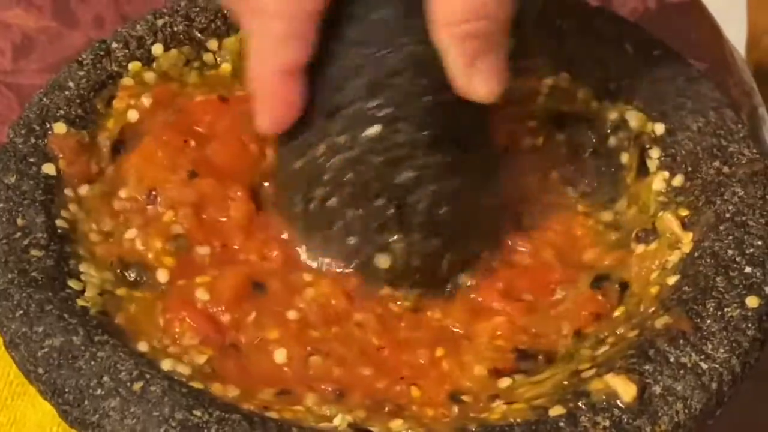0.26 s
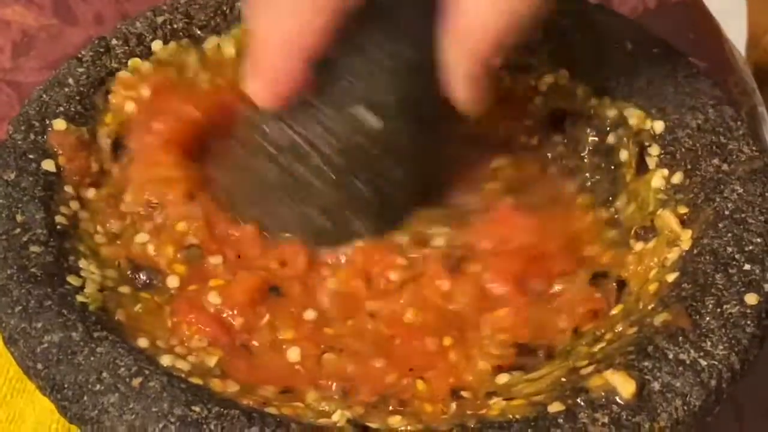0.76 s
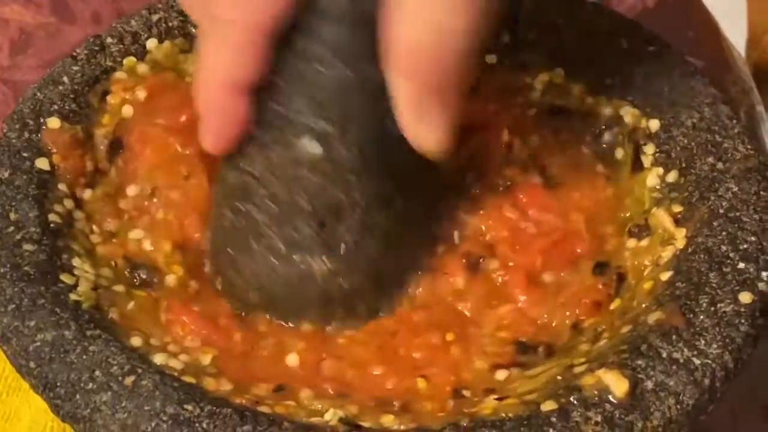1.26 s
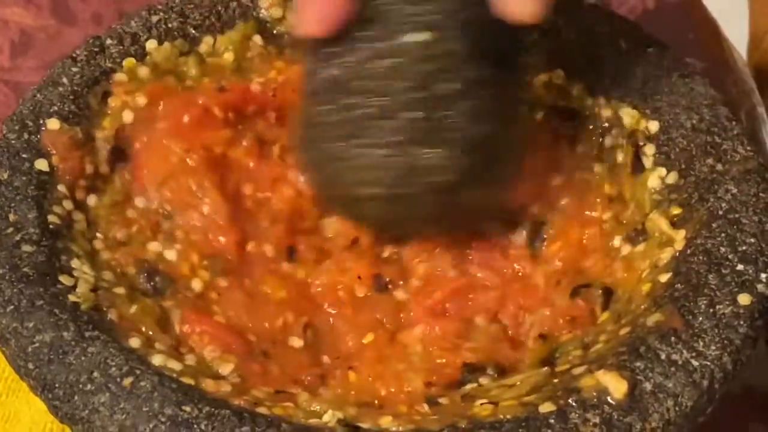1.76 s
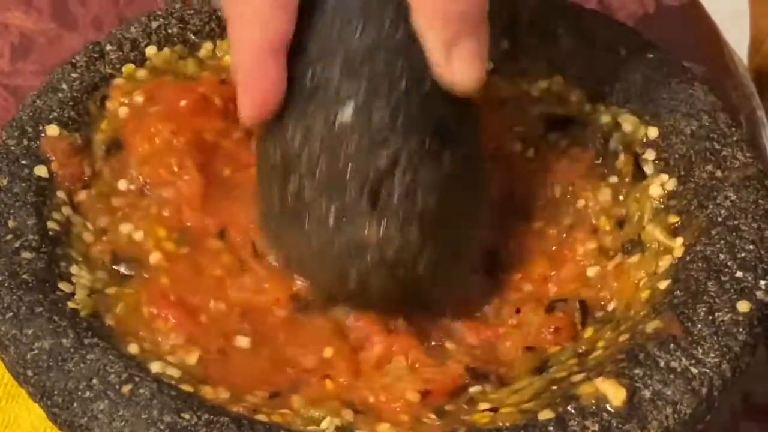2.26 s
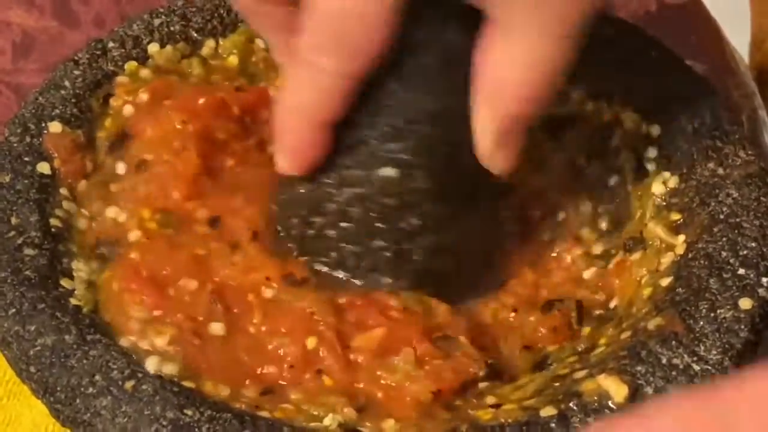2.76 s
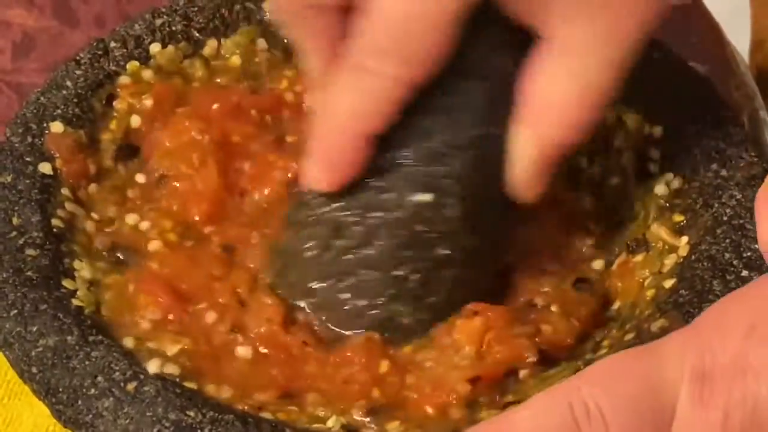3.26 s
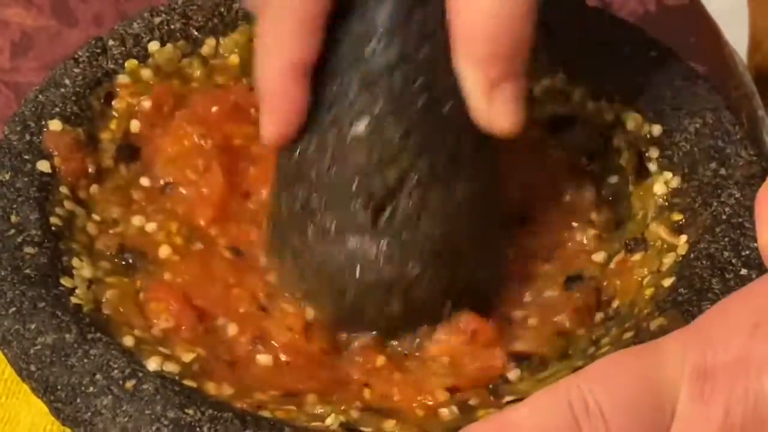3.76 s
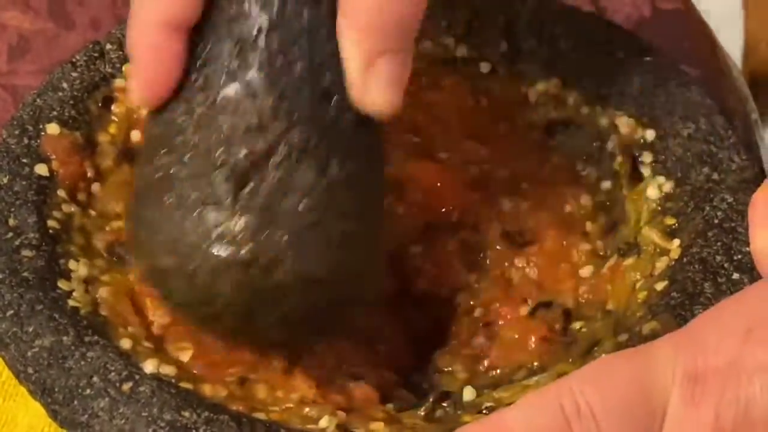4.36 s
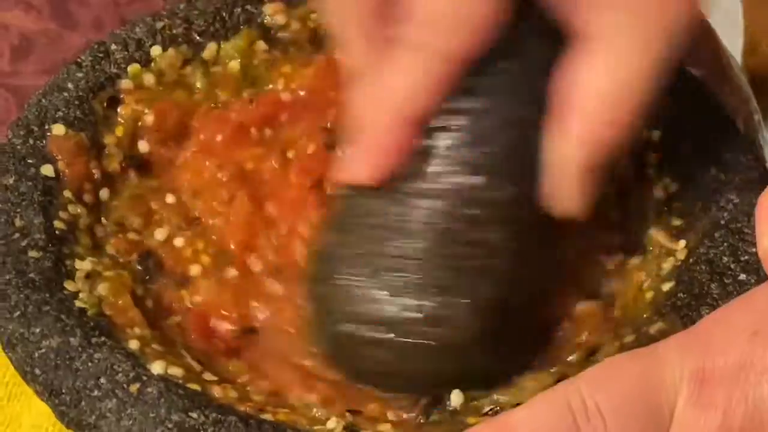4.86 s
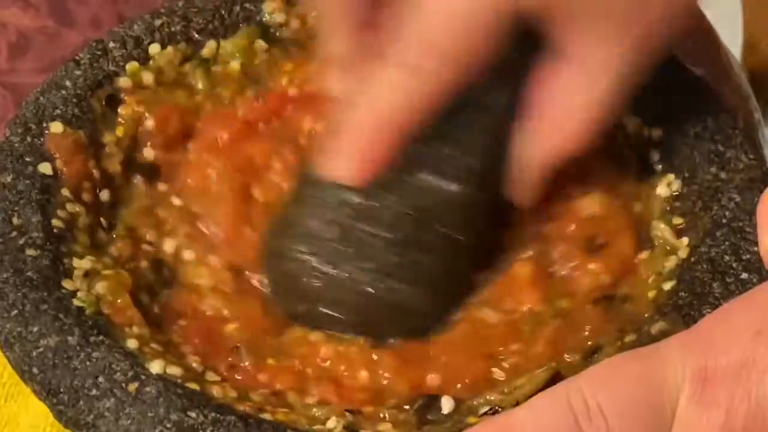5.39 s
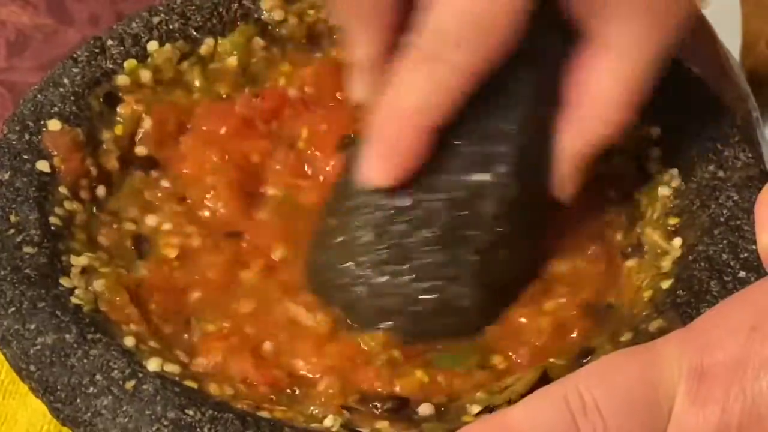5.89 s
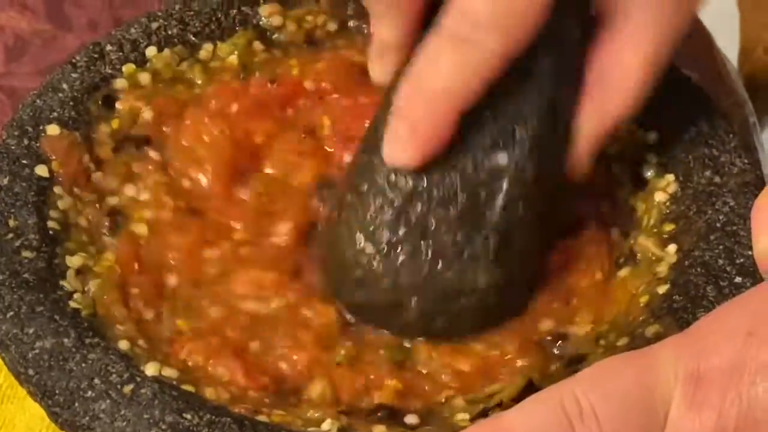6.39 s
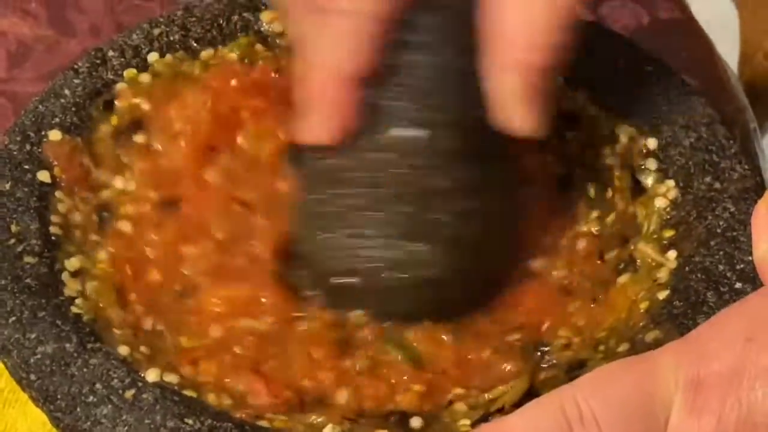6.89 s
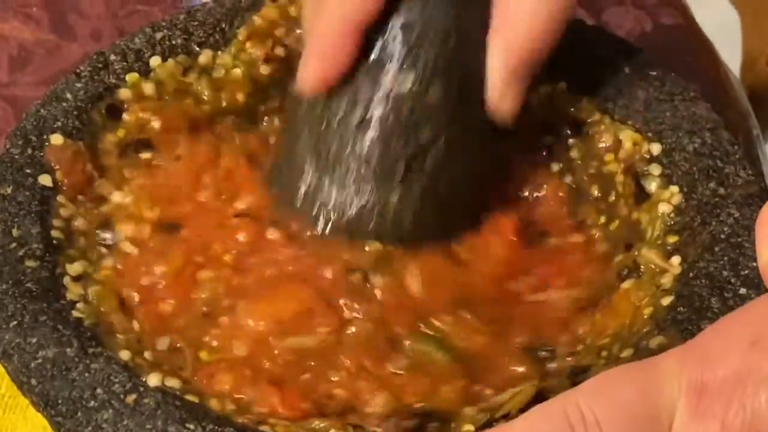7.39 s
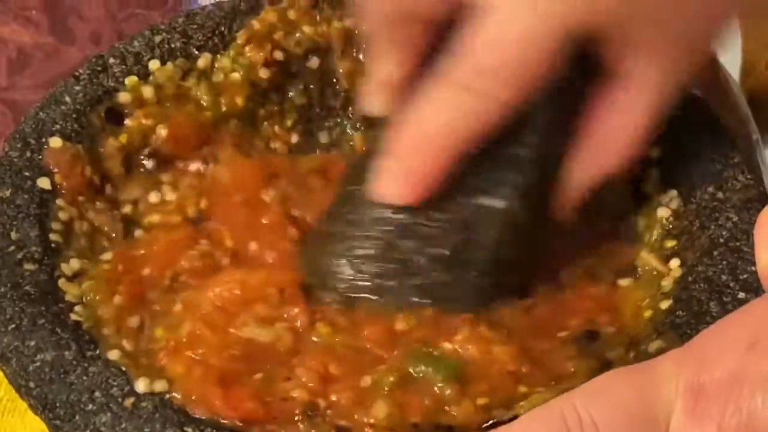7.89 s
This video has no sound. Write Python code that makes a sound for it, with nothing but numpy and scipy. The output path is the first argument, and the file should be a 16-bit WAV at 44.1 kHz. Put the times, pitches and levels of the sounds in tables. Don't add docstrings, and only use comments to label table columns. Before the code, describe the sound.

Close stereo sound of hand grinding in a rough stone bowl. It opens with a firm clack, then spaced, muffled knocks and quiet rubbing through mush. Midway the pestle strikes in quick clusters, with sharp stony cracks, crushed grit, brief hollow bowl ring and deep table thumps. Tiny wet snaps and bubble pops dot the gaps. The room is quiet and small, its echo faint, and the work remains uneven to the end.

```python
import sys
import numpy as np
from scipy import signal
from scipy.fft import rfft, irfft, next_fast_len
from scipy.io import wavfile

SR = 44100
rng = np.random.default_rng(int(sys.argv[2]) if len(sys.argv) > 2 else 0)


def master_out(mix):
    frames = np.transpose(np.atleast_2d(mix))
    ceiling = np.clip(frames, -1, 1)
    pcm = np.round(ceiling * 32767).astype(np.int16)
    wavfile.write(sys.argv[1], SR, pcm)


def boost(x):
    u = np.asarray(x, float) / 20
    return 10 ** u


N = 358974

# [f/Hz, likeness/1]
LIKENESS = [(60, 0.97), (130, 1), (290, 0.75), (640, 0.12), (1400, 0.5), (2500, 0.58)]
# [f/Hz, level/dB per Hz]
RUMBLE_SPECTRUM = [(25, -5), (60, -2), (110, -4.5), (155, 2), (200, -16), (300, -10.5), (420, -12.5),
                   (600, -56.5), (1000, -46.5)]
# [f/Hz, level/dB per Hz]
GRIT_SPECTRUM = [(300, -28), (500, 0), (800, -1.5), (1100, -4), (1600, -13.5), (2500, -18), (3500, -9.5)]
# [f/Hz, level/dB per Hz]
HISS_SPECTRUM = [(1800, 0.5), (3000, -2.5), (5500, 5.5), (7500, -7.5), (10000, 0.5), (13000, 1),
                 (16000, -21)]
# [f/Hz, level/dB per Hz]
CHATTER_SPECTRUM = [(450, 7.5), (800, 13), (1150, 5), (1500, -8), (2000, -10), (2700, -14), (3300, -34),
                    (6000, -21.5)]
# [f/Hz, level/dB per Hz]
CRUSH_SPECTRUM = [(850, -1), (1150, 4.5), (1500, -1), (2000, -4.5), (2600, -9), (3200, -14.5), (4000, -26)]
# [t/s, level/dB]
GRIND = [(0.0, -53), (0.5, -64.5), (1.59, -61.5), (3.31, -61), (3.92, -63), (4.03, -57.5), (5.37, -63.5),
         (5.78, -55), (5.92, -62.5), (6.53, -60), (6.89, -64.5), (7.07, -69), (7.71, -55), (8.14, -67)]
# [t/s, level/dB]
WET = [(0.0, -57), (0.93, -60), (1.24, -57.5), (3.96, -61.5), (4.34, -59.5), (4.5, -62.5), (7.04, -62.5),
       (7.78, -61), (8.0, -65.5)]
# [t/s, length/s, hiss rise/dB]
SQUEEZES = [(0.467, 0.032, 6.5), (0.727, 0.024, 5.5), (1.616, 0.032, 8), (2.15, 0.038, 5),
            (2.352, 0.046, 7), (2.762, 0.039, 5), (2.951, 0.032, 7.5), (3.422, 0.17, 4), (4.27, 0.025, 7.5),
            (4.602, 0.015, 6.5), (5.068, 0.08, 4), (5.422, 0.02, 6), (6.494, 0.021, 9), (7.738, 0.043, 8),
            (7.92, 0.028, 7)]
# [t/s, peak level/dB, f/Hz]
SNAPS = [(5.2821, -32.5, 4870), (.7086, -51, 6170), (.9045, -50, 11600), (1.497, -47, 4700),
         (1.7872, -49, 6340), (1.8217, -45, 3000), (2.3557, -32, 4760), (7.2535, -26.5, 8600),
         (2.3712, -38, 3000), (2.3945, -29, 5700), (2.9673, -46, 4400), (2.9735, -47.5, 7300),
         (3.8256, -46, 3000), (4.3242, -39, 3970), (4.3602, -38, 12900), (4.4134, -33.5, 7000),
         (4.4933, -47.5, 4880), (4.614, -47.5, 4300), (4.7018, -46.5, 3220), (4.75, -47, 4630),
         (5.069, -43.5, 4700), (5.7301, -43.5, 5520), (5.9301, -44.5, 4750), (6.4948, -47, 5000),
         (6.51, -42.5, 4800), (7.2625, -42, 3000), (7.6127, -41.5, 6230), (7.6188, -41.5, 3970),
         (7.7442, -48.5, 10700), (7.832, -40.5, 6780), (.5701, -62, 5850), (.6943, -53, 6710),
         (1.6207, -49, 4910), (3.1986, -45.5, 10300), (4.0377, -48.5, 11100), (4.2667, -52.5, 4290),
         (4.9277, -51, 5290), (5.9065, -53.5, 4530), (6.0536, -51, 3300), (6.4363, -53, 3070),
         (6.773, -48.5, 6700), (6.9771, -47.5, 6560), (7.039, -48.5, 5300), (7.058, -46.5, 3800),
         (7.075, -50.5, 4640), (7.7313, -51.5, 4300), (7.9299, -51.5, 5160), (1.1343, -43.5, 5750)]
# [t/s, peak level/dB, starting f/Hz, decay/s, climb/octaves per ms]
BUBBLES = [
    (1.7772, -34.5, 2040, 0.0032, 0.024),
    (1.793, -50, 1970, 0.0019, .05),
    (1.823, -37.5, 930, 0.0066, 0.09),
    (2.218, -46.5, 934, 0.012, 0.0053),
    (4.164, -25.5, 1586, 0.0065, 0.054),
    (4.209, -35, 2310, 0.0021, 0.073),
    (4.219, -33.5, 1730, 0.0026, 0.076),
    (7.176, -39.5, 477, 0.0039, 0.045),
    (7.464, -50, 1540, 0.0055, 0.044),
    (7.526, -50.5, 1450, 0.005, 0.019),
]
# [t/s, length/s, bowl level/dB, pestle level/dB re bowl]
SCRAPES = [(.01, 0.11, -41.5, -46), (1.5, 0.13, -47.5, -30.5), (7.273, 0.077, -56.5, -12),
           (0.913, 0.66, -63.5, 9.5), (4.181, 0.39, -53.5, 2.5), (6.017, 0.29, -58, 5.5),
           (2.6, 0.17, -60, -22), (2.792, 0.027, -55, -23.5), (0.351, 0.034, -56, 5.5),
           (0.395, 0.034, -44.5, -13), (0.722, 0.07, -57, 5), (3.885, 0.042, -38, -11),
           (3.964, 0.025, -38, -11), (4.472, 0.019, -33.5, -12.5), (5.368, 0.039, -34.5, -40.5),
           (6.427, 0.038, -46, -3), (6.711, 0.041, -31.5, -5), (6.956, 0.057, -35.5, -11.5),
           (7.004, 0.015, -36.5, -11), (7.051, 0.023, -44.5, -13), (7.611, 0.02, -51, 0),
           (7.838, 0.056, -48, -9), (1.933, 0.11, -45.5, -10), (5.575, 0.032, -44, -35),
           (7.35, 0.33, -62.5, 3.5)]
# [t/s, level/dB, decay/s]
CRUSHES = [(0.015, -41, 0.027), (1.136, -46.5, 0.0091), (1.513, -39, 0.029), (1.935, -45.5, 0.034),
           (3.201, -51, 0.014), (3.88, -40, .03), (4.41, -42.5, 0.022), (4.474, -41, .025),
           (4.759, -29, .035), (5.284, -43, 0.019), (5.597, -32.5, .04), (6.646, -39, 0.027),
           (6.9, -44.5, 0.018), (7.257, -34.5, 0.045), (7.641, -49, 0.023)]
# [t/s, level/dB, decay/s]
HUMS = [(0.018, -40, .05), (1.0, -67, 0.28), (1.94, -46, 0.022), (4.2, -60.5, 0.14), (4.762, -36, .04),
        (4.866, -41, 0.015), (5.6, -37, 0.034), (5.836, -47, .02), (6.08, -61.5, .15), (7.26, -36.5, 0.04),
        (7.36, -54, 0.11)]
# [t/s, lower mode level/dB, upper mode level/dB, upper mode f/Hz]
NICKS = [(3.893, -29, -49, 5670), (3.9004, -37, -48, 5490), (3.912, -32, -47, 5520),
         (3.927, -33, -58, 5360), (3.9444, -60, -62, 5460), (3.9684, -44, -64, 5670),
         (3.9739, -35, -59, 5280), (4.7906, -40, -54, 5490), (4.802, -34, -48, 5470),
         (4.825, -41, -61, 5250), (4.8424, -38, -58, 5420), (4.861, -43, -60, 5740),
         (5.621, -52, -67, 5400), (5.6444, -44, -62, 5870), (5.6625, -36, -66, 5540),
         (6.709, -46, -57, 5710), (6.7223, -50, -52, 5940), (6.729, -48, -45, 5630),
         (6.7354, -55, -57, 5630), (6.9641, -45, -63, 5400), (6.977, -44, -56, 5930),
         (6.9834, -49, -46, 5700), (7.0035, -50, -60, 5800), (7.0104, -47, -50, 5680),
         (7.2634, -39, -58, 5270), (7.272, -31, -55, 5510), (7.3074, -38, -59, 5470)]
# [f/Hz, level/dB, t60/s]
BOWL_MODES = [(660, -32.5, 0.16), (720, -13, 0.15), (790, -50.5, 0.2), (856, -23.5, 0.097),
              (900, -14.5, 0.13), (970, -21, 0.14), (1130, -19.5, 0.14), (1472, -25.5, 0.043),
              (1550, -40.5, 0.21), (2280, -36, 0.103)]
# [f/Hz, level/dB, t60/s]
PESTLE_MODES = [(2673, 2.5, 0.021), (2687, -13, 0.05), (5400, -25.5, 0.05), (7500, -43.5, 0.02),
                (9670, -20, 0.02)]
# [f/Hz, level/dB, time to full swing/s]
TABLE_MODES = [(76.5, -7.5, 0.0152), (221, -8, 0.01241), (300.7, -2, 0.00938), (414.5, -5, 0.00843),
               (512, -7, 0.00373)]
# [t/s, thud level/dB, main table mode f/Hz]
WOBBLES = [(0.377, -32, 130), (0.4149, -33, 85.5), (1.5605, -27.5, 150), (1.5967, -30, 150),
           (2.054, -33, 120), (2.8407, -30.5, 160), (3.2444, -32.5, 144), (3.347, -33.5, 150),
           (3.4843, -36, 149), (3.642, -39, 111), (3.976, -21.5, 135.7), (4.0891, -28, 117),
           (4.128, -30.5, 143), (4.5713, -27.5, 157), (4.818, -16, 152), (5.02, -30, 145),
           (5.332, -31.5, 136), (5.66, -23, 122), (5.702, -33.5, 154), (5.7744, -31.5, 164),
           (5.8509, -26, 139), (5.9038, -33, 136), (6.427, -35.5, 145), (6.6908, -23.5, 146),
           (6.724, -18, 151), (6.9485, -35, 137), (6.983, -19, 151.4), (7.056, -25.5, 156),
           (7.8517, -31.5, 92), (7.884, -36.5, 146)]
# [t/s, thud level/dB, main table
# mode f/Hz]
DULL_THUDS = [(0.3232, -15.5, 139), (0.7608, -35.5, 155), (2.0871, -32.5, 152), (2.6434, -33, 136),
              (2.6858, -33.5, 140), (2.9789, -34, 152), (4.229, -24.5, 138.5), (4.9455, -24.5, 144),
              (5.2447, -32.5, 101.4), (6.0865, -29, 94), (7.304, -25.5, 136), (7.3669, -29, 110),
              (4.409, -18, 300), (4.758, -14.5, 291), (5.378, -28.5, 298), (7.2536, -13.5, 144)]
# [t/s, clack level/dB, clack f/Hz]
ROCKS = [(0.059, -39, 970), (.3591, -37, 754), (.404, -45, 1250), (1.5247, -33, 720), (3.9021, -19.5, 930),
         (3.9704, -32, 820), (4.0029, -32.5, 740), (6.644, -11, 1335), (4.5751, -32.5, 600),
         (4.7456, -33.5, 1097), (4.783, -18.5, 852), (4.8098, -21, 648), (4.8791, -29.5, 756),
         (4.9621, -35, 910), (4.973, -32, 880), (5.0483, -35.5, 720), (5.301, -26.5, 690),
         (5.317, -36, 716), (2.838, -40, 790), (5.6607, -28, 980), (5.776, -28, 810), (5.8345, -26.5, 900),
         (5.8862, -33.5, 574), (6.734, -19.5, 520), (6.8198, -32.5, 588), (7.014, -33, 895),
         (7.028, -27, 690), (7.0478, -30.5, 586), (7.298, -35.5, 1070), (7.6556, -29, 663)]
# [t/s, clack level/dB, clack f/Hz, thud level/dB, crack level/dB re clack (hardness)]
POUNDS = [(0.0126, -14, 900, -19.5, 3.5), (1.1329, -17, 790, -22.5, -10.5), (1.51, -14, 783, -15, -8),
          (1.9337, -22.5, 900, -27, -5.5), (2.3944, -32, 1470, -72, -5), (2.9279, -34, 790, -28.5, -22),
          (3.1997, -24, 905, -31.5, -26), (3.54, -32, 790, -45, -36), (3.8772, -14, 694, -12, -3.5),
          (3.9148, -19, 600, -12.5, -10), (4.0751, -28.5, 1255, -33, -27), (4.168, -19.5, 520, -33.5, -16),
          (4.4075, -21.5, 1320, -22, 5), (4.4709, -14, 874, -22, -18), (4.7559, -3, 916, -10.5, -1),
          (4.8638, -17.5, 800, -25.5, -19), (5.2812, -17.5, 1280, -15, -8),
          (5.382, -29.5, 1100, -25.5, -29), (5.5937, -4, 946, -8, -2.5), (5.633, -15, 915, -28, -24),
          (6.6419, -11.5, 850, -9.5, -2), (6.8973, -16.5, 874, -17.5, -8.5), (7.2537, -6.5, 998, -33.5, -5),
          (7.6405, -21.5, 700, -22, -19)]


def in_time(rows):
    t_s, level_db = np.transpose(rows)
    return np.interp(np.arange(N) / SR, t_s, level_db)


def at_hz(points, hz):
    points = np.array(points)
    return np.interp(np.log(hz), np.log(points[:, 0]), points[:, 1])


def rms_one(x):
    return x / np.sqrt(np.mean(x ** 2) + 1e-20)


def drift(rate_hz):
    knots = rng.standard_normal(int(N / SR * rate_hz) + 2)
    return np.interp(np.arange(N) * rate_hz / SR, np.arange(len(knots)), knots)


def filtered(order, hz, kind, x):
    return signal.sosfilt(signal.butter(order, hz, kind, fs=SR, output="sos"), x)


def swing(hz, full_s, sharp, phase=0.):
    t = np.arange(1, int(8 * full_s * SR)) / SR / full_s
    hump = (t * np.exp(1 - t)) ** sharp
    return hump * np.cos(2 * np.pi * hz * full_s * (t - 1) + phase)


def add(out, t_s, burst):
    i = max(round(t_s * SR), 0)
    out[..., i:i + burst.shape[-1]] += burst[..., :N - i]


def banded_noise(spectrum, patchy_db, lumps, count=2):
    first_hz, last_hz = spectrum[0][0], spectrum[-1][0]
    edges = np.geomspace(first_hz, last_hz, round(np.log2(last_hz / first_hz) * count) + 1)
    white = rng.standard_normal((2, 2, N))
    out = 0
    for k, (low, high) in enumerate(zip(edges, edges[1:])):
        mid, side = filtered(2, [low, high], "band", white[k % 2])
        hz = np.sqrt(low * high)
        alike = np.clip(at_hz(LIKENESS, hz), 0, 1)
        gain = boost(at_hz(spectrum, hz) + patchy_db * drift(15))
        out = out + gain * (np.sqrt(1 + alike) * mid + np.sqrt(1 - alike) * side * [[1], [-1]])
    return rms_one(out * lumps)


def force_of(rows, longest_s):
    force, t = np.zeros(N), np.arange(int(longest_s * SR)) / SR
    for t_s, level_db, decay_s in rows:
        add(force, t_s, boost(level_db) * np.exp(-t / decay_s))
    return force


def contacts():
    rows = [(t_s, db, hz, crack_db) for t_s, db, hz, _, crack_db in POUNDS]
    for t_s, db, hz in ROCKS:
        rows.append((t_s, db, hz, -23.5 + 13.5 * np.log2(hz / 800)))
    out = []
    for t_s, db, hz, crack_db in rows:
        cushion_db = -21 * np.exp(-t_s / 0.91)
        ring_db = -7 + 1.2 * crack_db + 0.14 * max(db, -25) + cushion_db
        out.append((t_s, db, hz, ring_db, crack_db))
    return np.array(out)


def table_blows():
    main_hz, lag_s = 147.6, -0.001
    blows = []
    for t_s, db, _, thud_db, _ in POUNDS:
        upper_db = -13 + 0.67 * (db - thud_db) - 0.36 * db
        blows.append((t_s + lag_s, thud_db, main_hz, upper_db))
    blows += [(*row, -6.5) for row in WOBBLES]
    return blows + [(*row, -22.5) for row in DULL_THUDS]


def kitchen(x):
    t60_s, wall_cut_hz = 0.51, 3360
    size = next_fast_len(N + SR)
    w = 2 * np.pi * np.arange(size // 2 + 1) / size
    dull = 1 / (1 + 1j * w * SR / (2 * np.pi * wall_cut_hz))
    echo = np.zeros((2, len(w)), complex)
    for k, lag in enumerate((rng.uniform(.009, .04, 16) * SR).astype(int)):
        loop = boost(-60 * lag / SR / t60_s) * dull * np.exp(-1j * w * lag)
        echo[k % 2] += (-1) ** (k // 2) * loop / (1 - loop)
    wet = irfft(rfft(x, size) * echo, size)[:, :N]
    return filtered(2, 190, "high", wet)


def rumble():
    pressure_db = in_time(GRIND)
    level_db = -46 + 0.54 * (pressure_db - pressure_db.mean())
    lumps = boost(0.57 * drift(4.8))
    return boost(level_db) * banded_noise(RUMBLE_SPECTRUM, patchy_db=2.5, lumps=lumps, count=3)


def squelch(per_s, size_db):
    born = (rng.random(N) < per_s / SR) * boost(size_db * np.minimum(rng.exponential(1, N), 3))
    return 1 + signal.lfilter([1], [1, -.985], born)


def grit():
    return boost(in_time(GRIND)) * banded_noise(GRIT_SPECTRUM, patchy_db=4.5, lumps=squelch(45, size_db=-1.5))


def wet_swells():
    out = np.ones(N)
    for t_s, length_s, rise_db in SQUEEZES:
        t = np.arange(round(3 * length_s * SR)) / SR / length_s
        add(out, t_s, (boost(rise_db) - 1) * np.minimum(8 * t, 1) * np.exp(-t ** 2))
    return out


def hiss():
    noise = banded_noise(HISS_SPECTRUM, patchy_db=1.8, lumps=squelch(45, size_db=0.5))
    return boost(in_time(WET)) * wet_swells() * noise


def snaps():
    out, spits = np.zeros(N), np.zeros(N)
    splashes = [(t_s, db - 26 + 0.17 * crack_db, 3020) for t_s, db, _, _, crack_db in POUNDS]
    rows = list(SNAPS) + splashes
    spit = rng.standard_normal((len(rows), 120)) * np.exp(-np.arange(120) / 82.0)
    for (t_s, peak_db, hz), noise in zip(rows, spit):
        add(out, t_s, boost(peak_db + 6.0) * swing(hz, 0.000449, 4.6))
        add(spits, t_s, boost(peak_db + 2.0) * noise)
    return out + filtered(2, [2500, 11000], "band", spits)


def bubbles():
    out, ragged = np.zeros(N), boost(1.5 * drift(530))
    for t_s, peak_db, hz, decay_s, octaves_per_ms in BUBBLES:
        t = np.arange(round(3 * decay_s * SR)) / SR
        cycles = np.cumsum(hz * 2 ** (1000 * octaves_per_ms * t)) / SR
        envelope = np.exp(-(t / decay_s) ** 2) * np.minimum(t / 0.00021, 1)
        add(out, t_s, boost(peak_db) * envelope * np.sin(2 * np.pi * cycles))
    return out * ragged


def strokes():
    out = np.zeros((2, N))
    for t_s, length_s, bowl_db, pestle_db in SCRAPES:
        stroke = np.sqrt(np.hanning(round(length_s * SR)))
        add(out, t_s, boost(bowl_db + np.array([[0], [pestle_db]])) * stroke)
    return out


def pestle_rasp(dragged, grains_per_s, width_hz):
    grains = (rng.random(N) < grains_per_s / SR) * rng.standard_normal(N) + 1e-18
    r = np.exp(-np.pi * width_hz / SR)
    out = 0
    for hz, level_db, _ in PESTLE_MODES[1:]:
        ring = signal.lfilter([1, 0, -1], [1, -2 * r * np.cos(2 * np.pi * hz / SR), r * r], grains)
        out = out + boost(0.54 * level_db) * rms_one(ring)
    return dragged * out


def chatter(dragged, quick_s, slow_s, slow_db):
    t_s, peak_db = contacts().T[:2]
    power = np.zeros(N)
    power[(t_s * SR).astype(int) + 40] = boost(2 * (peak_db - 13.0))
    quick = signal.lfilter([1], [1, -np.exp(-1 / (quick_s * SR))], power)
    slow = signal.lfilter([boost(2 * slow_db)], [1, -np.exp(-1 / (slow_s * SR))], power)
    noise = banded_noise(CHATTER_SPECTRUM, 0.55, lumps=boost(3.1 * drift(220)), count=3)
    return np.sqrt(quick + slow + dragged ** 2) * noise


def crushes():
    noise = banded_noise(CRUSH_SPECTRUM, 0.5, lumps=boost(2.5 * drift(250)), count=3)
    return force_of(CRUSHES, 1 / 3) * noise


def hums():
    mid, side = rms_one(filtered(2, [930, 1260], "band", rng.standard_normal((2, N))))
    return force_of(HUMS, 0.5) * boost(3.7 * drift(90)) * (mid + 0.49 * side * np.array([[1], [-1]]))


def thuds():
    blows, out = table_blows(), np.zeros((2, N))
    chance = rng.uniform(-1, 1, (len(blows), 2 * len(TABLE_MODES)))
    for (t_s, peak_db, hz, upper_db), row in zip(blows, chance):
        add(out, t_s, boost(peak_db + np.array([[.6], [-.4]])) * swing(hz, 0.01426, 2.45))
        for (mode_hz, level_db, full_s), a, b in zip(TABLE_MODES, row[::2], row[1::2]):
            share_db = level_db + (upper_db + 4.0 * a if mode_hz > 200 else 0)
            turn = 0.0015 * mode_hz * b
            tone_hz = mode_hz * (1 + 0.094 * b)
            phase = mode_hz / 88.6 * a
            left = swing(tone_hz, full_s, 0.94, phase + turn)
            right = swing(tone_hz, full_s, 0.95, phase - turn)
            add(out, t_s, boost(peak_db + share_db) * np.array([left, right]))
    return -out


def nicks():
    out, t = np.zeros(N), np.arange(SR // 10) / SR
    attack = np.minimum(t / 0.00094, 1)
    for t_s, low_db, high_db, high_hz in NICKS:
        for hz, db, t60_s in ((2790, low_db - 1.5, 0.037), (high_hz, high_db + 4.0, 0.029)):
            add(out, t_s, boost(db - 60 * t / t60_s) * attack * np.sin(2 * np.pi * hz * t))
    return out


def struck(modes, strength_db, spread_db, soft_hz, falloff_db):
    t_s, _, clack_hz = contacts().T[:3]
    at, out = (t_s * SR).astype(int), np.zeros((2, N))
    for hz, level_db, t60_s in modes:
        clicks = np.full((2, N), 1e-18)
        both, apart = rng.standard_normal((len(at), 2)).T
        chance = both + 0.3 * apart * np.array([[1], [-1]])
        away = abs(np.log2(hz / clack_hz))
        clicks[:, at] = boost(strength_db + level_db + spread_db * chance - falloff_db * away)
        r, w = boost(-60 / (t60_s * SR)), 2 * np.pi * hz / SR
        out += signal.lfilter([0, np.sin(w)], [1, -2 * r * np.cos(w), r * r], clicks)
    return filtered(1, soft_hz, "low", out)


def bowl_ring():
    ring = struck(BOWL_MODES, contacts()[:, 1] - 6.0, spread_db=6.5, soft_hz=3000, falloff_db=14.5)
    return ring * boost(4.8 * drift(120) + np.array([[1.7], [-1.7]]))


def pestle_ring():
    _, peak_db, _, ring_db, _ = contacts().T
    ring = struck(PESTLE_MODES, peak_db + ring_db, spread_db=2, soft_hz=15000, falloff_db=1.5)
    return ring * boost(4.5 * drift(200))


def clacks():
    rows, out = contacts(), np.zeros((2, N))
    chance = rng.uniform(-1, 1, (len(rows), 4))
    for (t_s, peak_db, hz, _, crack_db), (a, b, c, d) in zip(rows, chance):
        sides = boost(peak_db + np.array([[2.2], [-1.6]]))
        clack = [swing(hz, .0021, 3.6, a + 0.048), swing(hz, .0021, 1.9, a - .6)]
        crack = [swing(1850 + 120 * b, 0.00052, 0.5, np.pi * d + lead) for lead in (.35, -.35)]
        knock = [swing(1430 + 80 * c, 0.0014, 4.2, np.pi * b + lead) for lead in (.55, -.55)]
        add(out, t_s, sides * clack)
        add(out, t_s, sides * boost(crack_db - 6.5) * crack)
        add(out, t_s, sides * boost(crack_db - 5.0) * knock)
    return out


def scene():
    stone = clacks() + bowl_ring() + pestle_ring() + nicks()
    table = thuds()
    pulp = snaps() + bubbles()
    room = kitchen(boost(-22.0) * stone.mean(axis=0) + boost(-18) * table.mean(axis=0) + boost(-20.5) * pulp)
    on_bowl, on_pestle = strokes()
    rubbed = chatter(on_bowl, quick_s=0.0071, slow_s=0.036, slow_db=-13.5)
    rubbed = rubbed + pestle_rasp(on_pestle, grains_per_s=1300, width_hz=450)
    between = rumble() + grit() + hiss()
    return room + between + pulp + rubbed + crushes() + hums() + table + stone


def top_cut(x):
    return signal.sosfilt(signal.butter(12, 16970, fs=SR, output="sos"), x)


def record(dry):
    cutoff_hz, merged_from_hz, split_from_hz = 15850, 2100, 7550
    turn_zero_hz, turn_period_hz = 7000, 4200
    size = next_fast_len(N)
    hz = np.arange(size // 2 + 1) * SR / size
    pair = rfft(1.05 * np.tanh(dry / 1.05), size) / (1 + (hz / cutoff_hz) ** 120)
    pair = pair / (1 - 1j * 36.4 / (hz + 1)) ** 2
    turn = np.pi * (hz - turn_zero_hz) / turn_period_hz * (hz > split_from_hz)
    common, apart = np.cos(turn), np.sin(turn)
    common[abs(common) < .42] *= boost(-14)
    apart[abs(apart) < .5] *= boost(-14)
    merged = pair[0] * (common + 1j * apart * [[-1], [1]])
    share = .95 / (1 + (merged_from_hz / (hz + 1)) ** 12)
    share[hz > split_from_hz] = 1
    mix = irfft(share * merged + (1 - share) * pair, size)[:, :N]
    return top_cut(mix)


dry = scene()
out = record(dry)
master_out(out)
```